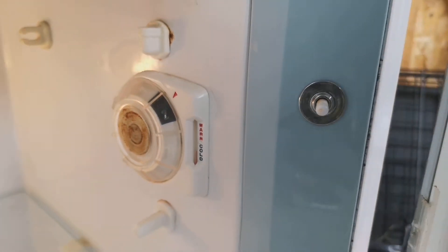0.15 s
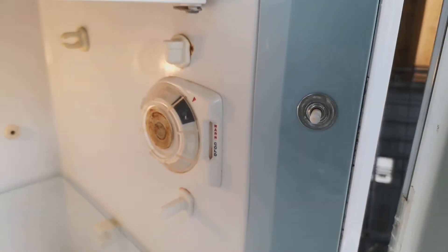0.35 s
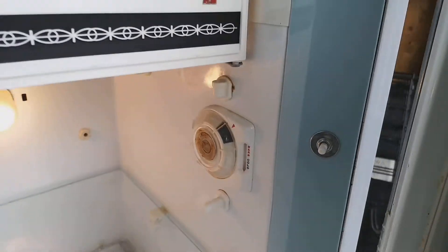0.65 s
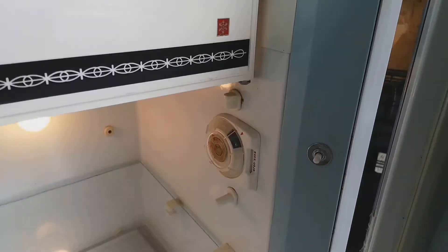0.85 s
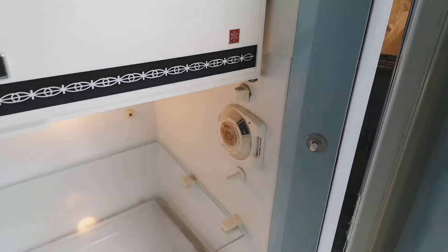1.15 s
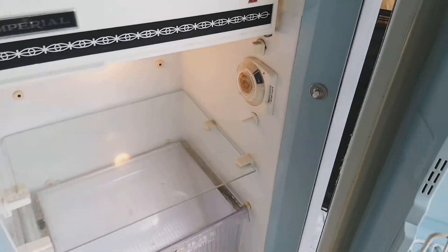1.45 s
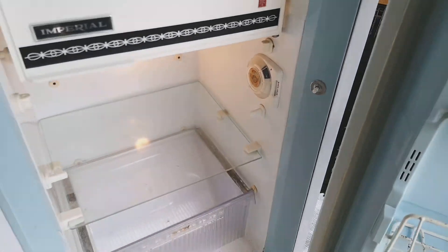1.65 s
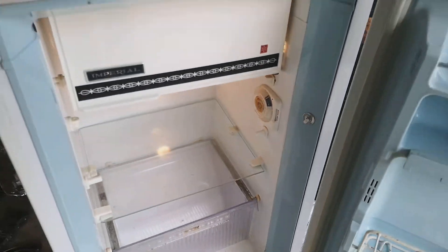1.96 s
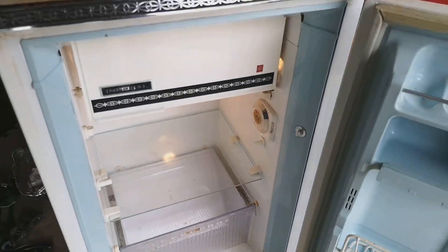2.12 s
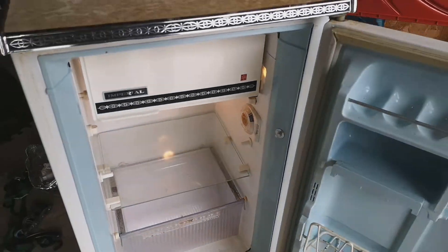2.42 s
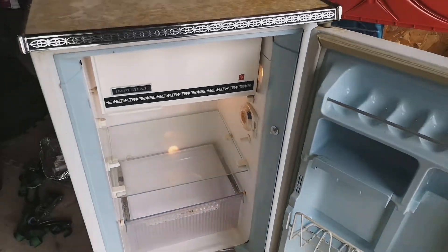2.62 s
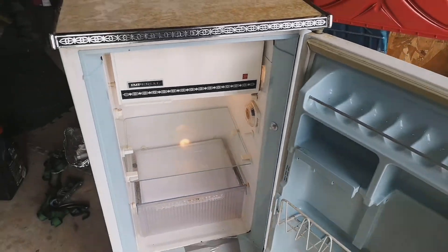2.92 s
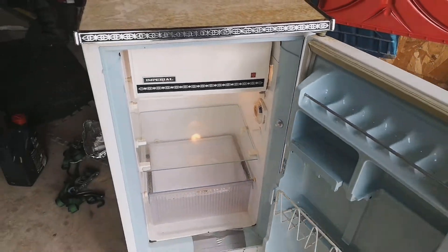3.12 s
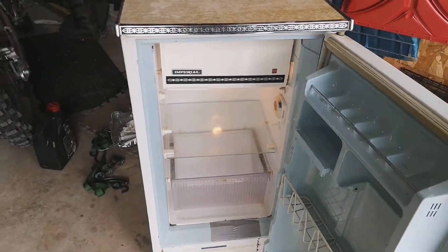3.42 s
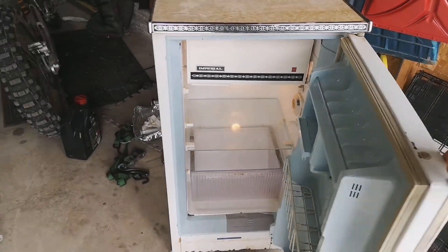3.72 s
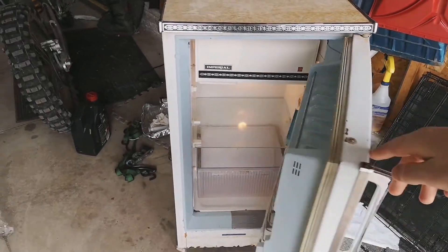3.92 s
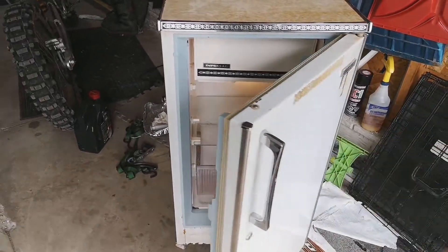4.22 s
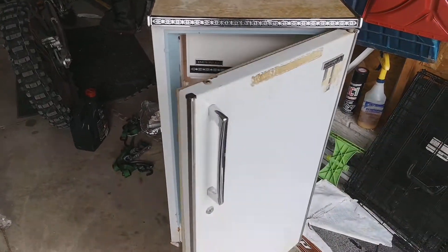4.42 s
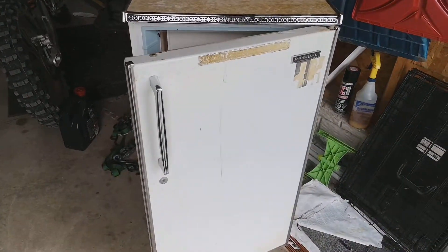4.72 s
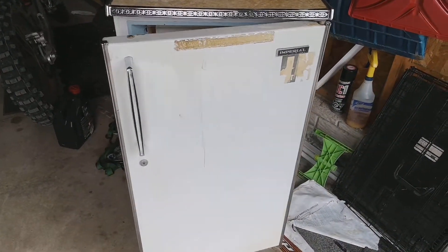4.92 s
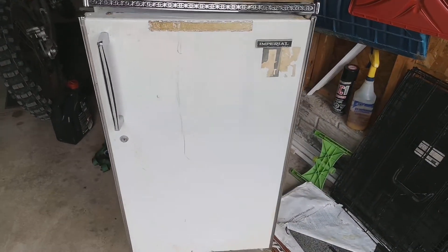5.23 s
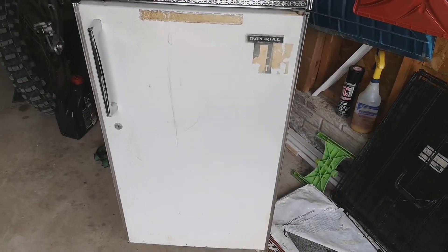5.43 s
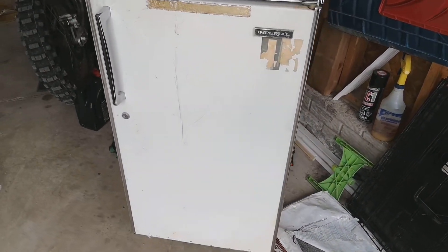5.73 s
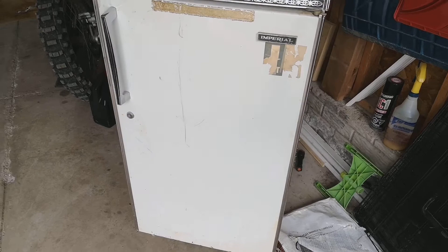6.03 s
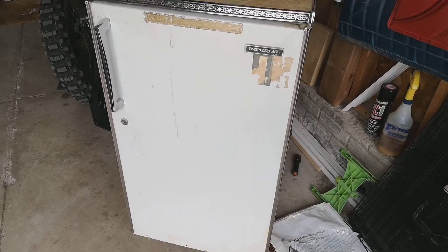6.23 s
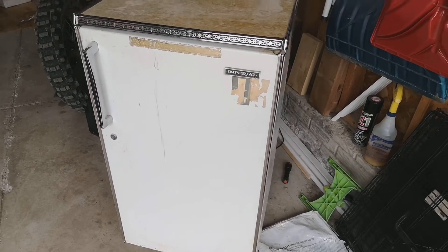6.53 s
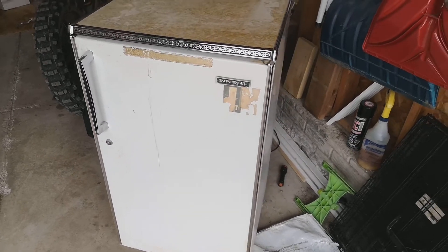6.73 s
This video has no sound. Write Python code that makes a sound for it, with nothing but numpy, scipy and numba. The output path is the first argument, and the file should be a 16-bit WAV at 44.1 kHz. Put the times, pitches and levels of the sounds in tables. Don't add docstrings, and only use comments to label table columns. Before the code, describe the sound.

Close handheld stereo pickup with bright, slightly hissy treble and a faint high whine. Someone shuffles on gritty concrete, soles crushing and dragging grains, loudest early on, with isolated clicks. Movement thins out, then a refrigerator door thuds shut, its hollow panels rattling briefly and trapped air booming. Short hard-walled garage echo follows, then small gritty footfalls over the low motor hum.

```python
import sys
import numpy as np
from scipy import signal
from scipy.io import wavfile
from scipy.ndimage import uniform_filter1d
from numba import njit

SR = 44100
rng = np.random.default_rng(int(sys.argv[2]) if len(sys.argv) > 2 else 0)


def store_wav(level_fs):
    pcm = np.round(np.clip(np.atleast_2d(level_fs), -1, 1) * 32767)
    wavfile.write(sys.argv[1], SR, pcm.T.astype(np.int16))


def ratio_of_db(decibels):
    return 10 ** (np.asarray(decibels, float) / 20)


N = 302526


def level(x, db):
    return x * ratio_of_db(db) / np.sqrt(np.mean(x ** 2))


def band(x, hz, width_hz):
    return signal.lfilter(*signal.iirpeak(hz, hz / width_hz, fs=SR), x)


def cut(x, hz, kind, order=2):
    return signal.sosfilt(signal.butter(order, hz, kind, fs=SR, output="sos"), x)


def walk(rate_hz):
    hold = int(SR / rate_hz)
    steps = np.repeat(rng.standard_normal(N // hold + 1), hold)
    return 1.57 * uniform_filter1d(uniform_filter1d(steps, hold), hold)[:N]


def fade(t, t60_s):
    return np.exp(-np.log(1000) * t / t60_s)


def add(out, start_s, x, pan_db=0.):
    i = int(start_s * SR)
    x = np.atleast_2d(x)[:, :N - i]
    out[:, i:i + x.shape[1]] += x * ratio_of_db(np.array([[pan_db], [-pan_db]]) / 2)


FADE_DB, ROUNDNESS = 21.5, 1.49


def swells(rows, rest_db, lag_s=0., lingers=0.57):
    t = np.arange(0, N + 32, 32) / SR
    peak_s, db, rise_s, fall_s = (column[:, None] for column in np.transpose(list(rows)))
    away = t - peak_s - np.minimum(lag_s, rise_s)
    away = np.where(away < 0, -away / rise_s, away / (fall_s * lingers))
    power = ratio_of_db(db - FADE_DB * away ** ROUNDNESS) ** 2
    return np.interp(np.arange(N) / SR, t, np.sqrt(power.sum(axis=0) + ratio_of_db(rest_db) ** 2))


# peak in seconds, fine grit in dB,
# rise in seconds, fall in seconds, weight (coarse scrape minus fine) in dB.
SCUFFS = [(.62, -35.5, 0.16, 0.51, -12), (.665, -31.5, 0.091, 0.062, -18.5), (.71, -29, 0.049, 0.1, -18),
          (.764, -29.5, 0.071, 0.032, -7.5), (0.821, -30.5, 0.041, 0.094, -7.5),
          (0.891, -28, 0.062, 0.1, -9.5), (.97, -41.5, 0.039, 0.16, -15), (1.253, -33.5, 0.055, 0.082, -13),
          (1.373, -23, 0.0069, 0.094, -9.5), (1.399, -24, 0.028, 0.023, -9), (2.115, -20, 0.056, 0.087, -10),
          (2.158, -31, 0.11, 0.085, -1.5), (2.286, -22.5, 0.0055, 0.21, -6), (2.331, -21, 0.04, 0.1, -7.5),
          (2.921, -41.5, 0.0082, 0.31, -18), (2.965, -41.5, 0.036, 0.13, -2), (3.0, -40, 0.1, 0.075, -3),
          (3.03, -43, 0.06, 0.082, 0), (3.268, -38, 0.006, 0.32, -7), (3.32, -28, 0.048, 0.085, -10),
          (3.358, -29, 0.055, 0.059, -10.5), (4.27, -46.5, 0.12, 0.47, -17), (4.391, -39, 0.12, 0.15, -4.5),
          (4.898, -41, 0.0097, 0.036, -24), (5.082, -52.5, 0.17, 0.22, -1.5), (5.89, -36, 0.02, 0.05, -11),
          (5.91, -39.5, 0.071, 0.18, -6.5), (6.019, -41, 0.035, 0.081, -7.5), (6.583, -37, 0.01, 0.13, -8),
          (6.62, -35.5, 0.066, 0.046, -9.5),
          (.02, -62.5, 0.12, 0.11, 0.5), (.15, -44.5, 0.15, 0.31, -13), (.225, -43, 0.1, .1, -22),
          (.3, -37, .02, 0.031, -35), (.37, -50.5, 0.37, 0.33, -9.5), (.48, -54, 0.082, 0.5, -2.5),
          (2.53, -60.5, .1, 0.18, -6.5), (3.121, -62.5, 0.11, 0.2, 0), (4.891, -41.5, 0.0037, 0.047, -15.5),
          (1.098, -51.5, 0.063, 0.98, -11.5), (1.46, -49.5, 0.063, 0.18, -5.5),
          (1.6, -49, 0.44, 0.58, -17.5), (2.056, -33, 0.033, 0.095, -21), (2.62, -55, 0.17, 0.12, -6.5),
          (2.742, -61.5, 0.048, 0.24, -11.5), (2.87, -52, .03, 0.25, -31), (3.49, -59, .1, 0.08, -16),
          (3.606, -64, 0.13, 0.16, -25.5), (3.82, -61, 0.11, 0.11, -30), (4.56, -52.5, 0.37, 1, -16.5),
          (5.859, -40, 0.012, 0.092, -27), (4.925, -46, 0.022, 0.078, -20), (6.1, -66, .1, 0.39, 0.5),
          (6.385, -59, .03, 0.41, -21), (6.53, -51, 0.25, 0.27, -11.5), (6.7, -46, 0.13, 0.29, -18.5),
          (6.85, -42, 0.085, .1, -12)]
GASKET = [
    (5.28, -62.5, 0.056, 0.18, -2),
    (5.42, -47, 0.019, 0.49, -11.5),
    (5.518, -37, 0.043, 0.034, -12),
    (5.536, -23, 0.0038, 0.044, -11),
    (5.549, -35.5, 0.03, 0.14, -5),
    (5.6, -48, 0.05, 0.17, -8),
    (5.7, -61, .1, 0.29, -1.5),
]
GRIT_REST_DB = -74.5


def press(more_db, lag_s, lingers):
    peak_s, fine_db, rise_s, fall_s, weight_db = np.transpose(SCUFFS + GASKET)
    db = fine_db + more_db(fine_db, weight_db)
    return swells(zip(peak_s, db, rise_s, fall_s), GRIT_REST_DB, lag_s, lingers)


def fine_grit(grit):
    return press(lambda fine_db, weight_db: 0, 0., 0.8) * level(cut(grit, 6720, "high"), -3.0)


def patchy_bands(x, patchy_db, size=1536, count=2):
    z = signal.stft(x, nperseg=size)[2]
    patches = rng.standard_normal((z.shape[1], z.shape[2] // count + 1))
    db = np.repeat(patches, count, axis=1)[:, :z.shape[2]]
    return signal.istft(z * ratio_of_db(patchy_db * db), nperseg=size)[1][:, :N]


SCRAPE_LAG_S, SCRAPE_LINGERS = 0.00031, 0.89
# resonance in Hz, width in Hz, level in dB.
SCRAPE = [(850, 285, 6.5), (1500, 1900, -4), (1970, 2000, -8.5), (3480, 1400, -4.5), (5430, 2370, -2.5)]


def scrape(grit):
    gain = press(lambda fine_db, weight_db: weight_db, SCRAPE_LAG_S, SCRAPE_LINGERS)
    coarse = sum(ratio_of_db(db + 2.6 * walk(22)) * band(grit, hz, width_hz) for hz, width_hz, db in SCRAPE)
    coarse = cut(patchy_bands(coarse, patchy_db=6.5), 1027, "high", order=4)
    return gain * level(coarse, 2.45)


RUMBLE_DB, RUMBLE_TOP_DB, RUMBLE_LINGERS = -11.5, -56, 0.89
# peak in seconds, rumble in dB, rise in seconds, fall in seconds.
LANDINGS = [
    (.45, -67, 0.18, 0.4),
    (3.0, -50, 0.039, 0.17),
    (.88, -45, 0.066, 0.3),
    (1.385, -34, 0.022, 0.063),
    (2.165, -51, 0.079, 0.077),
    (2.315, -43.5, 0.031, 0.23),
    (3.325, -42.5, 0.085, 0.13),
    (4.41, -47.5, 0.063, 0.1),
    (6.0, -56, 0.12, 0.11),
]


def rumble(grit):
    gain = press(lambda fine_db, weight_db: np.minimum(RUMBLE_DB + weight_db, RUMBLE_TOP_DB - fine_db),
                 SCRAPE_LAG_S, RUMBLE_LINGERS)
    gain = np.hypot(gain, swells(LANDINGS, GRIT_REST_DB))
    sole = band(band(grit[0] + 0.15 * grit, 560, 550), 680, 600)
    return gain * level(sole * ratio_of_db(1.3 * walk(30)), -2)


BODY_HZ, BODY_WIDTH_HZ = 1100, 990
# peak in seconds, level in dB, rise in seconds, fall in seconds.
BODIES = [(.65, -52, .15, .2), (.9, -46, 0.11, .15), (1.25, -48, 0.047, 0.076), (1.39, -43, .02, .1),
          (2.16, -37, 0.071, 0.095), (2.32, -37, 0.042, .14), (2.96, -44, .05, .1),
          (3.02, -42.5, 0.076, 0.1), (3.33, -45.5, 0.053, 0.09), (4.4, -54.5, 0.093, 0.14),
          (5.9, -55, .05, 0.22), (6.02, -57, .05, 0.11), (6.6, -52, 0.026, 0.11)]


def scuff_body(grit):
    shared = grit + 0.59 * grit[::-1]
    hollow = band(band(shared, BODY_HZ, BODY_WIDTH_HZ), BODY_HZ, 1.4 * BODY_WIDTH_HZ)
    return level(hollow, 0) * swells(BODIES, -89.0)


def scuffs():
    pan_db = 0.6 + 1.4 * walk(14)
    grit = rng.standard_normal((2, N))
    grit *= ratio_of_db(1.77 * rng.exponential(size=(2, N)) + 0.5 * walk(160) + 0.92 * walk(40))
    rubbing = scuff_body(grit) + fine_grit(grit) + scrape(grit) + rumble(grit)
    return ratio_of_db(np.array([pan_db, -pan_db]) / 2) * rubbing


# start in seconds, peak in dB, dull part minus bright in dB,
# left minus right in dB.
CRACKS = [(0.0294, -57, -12, 12), (0.177, -21.5, -32, 10), (0.216, -20.5, -33, 3), (0.288, -38, -20, 5),
          (0.2954, -27, -28, 10), (0.2994, -30, -22, 3), (3.8503, -42, -25, 5), (2.8957, -40, -20, 8),
          (2.886, -44, -15, 8), (5.843, -39, -25, 8), (5.8867, -33, -15, 8), (5.8902, -31, -15, 6),
          (6.006, -38, -20, 7), (3.886, -51, -30, 5), (.5023, -40, -20, 8), (4.8985, -24.5, -26, 15),
          (4.902, -25.5, -24, 18), (2.312, -16, -22, 8), (2.3224, -15, -22, 7), (3.316, -30, -8, 3),
          (2.8, -55, -20, 5), (1.0794, -55, -23, 1), (1.3733, -23, -16, 20), (1.8799, -29.5, -0.5, 10),
          (1.907, -28.5, -7.5, 11), (1.9643, -29.5, -3, 5), (1.9688, -34, 2.5, 14), (1.973, -28, -31, -2),
          (2.2833, -17, -19, 15), (2.4545, -33, -25, 9), (2.7412, -50, -27, 14), (2.855, -34, -16, 9),
          (2.877, -34, -37, 10), (2.9115, -25.5, -20, 11), (3.266, -33, -3, 8), (3.7915, -32.5, -10, 11),
          (3.8205, -35, -22, 1), (3.8357, -35, -19, 12), (6.379, -53, -27, 18), (4.0158, -46, -24, -1),
          (4.896, -30, -30, 23), (5.4177, -33, -22, 12), (5.853, -33, -26, 8), (6.0942, -32, -23, 21),
          (6.1254, -48, -30, 13), (6.516, -33.5, -32, 14), (6.581, -28, -16, 18)]


def cracks(out):
    t = np.arange(4000) / SR
    for start_s, db, dull_db, pan_db in CRACKS:
        snap = np.minimum(t / 0.00052, 1) * fade(t, 0.0044)
        fizz = 0.068 * fade(t, 0.039)
        burst = rng.standard_normal((2, len(t))) * (snap + fizz)
        burst[1] = 0.44 * burst[0] + 2.27 * burst[1]
        bright, dull = cut(burst, 8500, "high"), band(burst, 6100, 5500)
        sound = bright / np.abs(bright).max() + ratio_of_db(dull_db - 2.5) * dull / np.abs(dull).max()
        add(out, start_s, ratio_of_db(db + 3) * sound, pan_db)


# mode in Hz, level in dB, ring (T60) in seconds.
CABINET = [(38, -16, .25), (82, -21, .25), (207, -18, .2), (112.8, -17, 0.39), (133.4, -26, .4),
           (383, -18, 0.14), (510, -28, 0.12), (160, -23.5, 0.46), (189.7, -24, 0.41), (230, -27, 0.21),
           (249.3, -8.5, 0.15), (271, -15, .1), (300, -4.5, 0.047), (335, -10.5, 0.16), (434, -13, 0.072),
           (480, -10.5, 0.05), (590, -20, 0.098), (673, -17, 0.056), (763, -24, 0.075), (860, -1, 0.028),
           (905, -19, 0.1), (1010, -39, 0.1), (1150, -26, 0.14), (1500, -28, 0.14), (1700, -16, 0.09),
           (1845, -21, 0.15)]


def panel_ring(t):
    return sum(ratio_of_db(db) * np.sin(2 * np.pi * hz * t) * fade(t, t60_s) for hz, db, t60_s in CABINET)


# start in seconds, pitch in Hz, peak in dB, swell in seconds.
BOOM = (5.5315, 66, -23.5, .028)


def boom(out, t):
    start_s, hz, db, swell_s = BOOM
    swell = t / swell_s * np.exp(1 - t / swell_s)
    add(out, start_s, ratio_of_db(db) * swell * np.sin(2 * np.pi * hz * t))


DOOR_PAN_DB = 1.2
# start in seconds, push in dB, contact in ms, crack in dB.
BLOWS = [
    (5.53, -2, 3.7, -36),
    (5.5358, 1.5, 0.34, -17),
    (5.5388, -9, 0.54, -34),
    (5.5432, -8.5, 1.03, -35),
    (5.55, -4, 1.9, -38),
    (5.5596, 2, 2.26, -36),
    (5.58, -9, 4.4, -46),
    (5.605, -6, 2.7, -38),
    (5.638, -15, 3.1, -52),
    (5.688, -28, 3.3, -61),
]


def door(out):
    t = np.arange(SR) / SR
    ring = panel_ring(t)
    for start_s, push_db, contact_ms, crack_db in BLOWS:
        push = np.hanning(int(contact_ms * SR / 1000) + 3)
        thump = signal.fftconvolve(ring, push / push.sum())
        add(out, start_s, ratio_of_db(push_db - 23.0) * thump, DOOR_PAN_DB)
        crack = cut(rng.standard_normal((2, len(t))), 1700, "high") * fade(t, 0.0047)
        add(out, start_s, ratio_of_db(crack_db) * crack)
    shaking = cut(rng.standard_normal(len(t)), 970, "low") * fade(t, 0.25)
    add(out, BLOWS[1][0], ratio_of_db(-52) * signal.fftconvolve(ring, shaking), DOOR_PAN_DB)
    boom(out, t)


# start in seconds, #
# peak in dB, pitch in Hz, ring in seconds.
KNOCKS = [(0.376, -39.5, 1620, 0.046), (.378, -46.5, 2260, 0.034), (0.378, -42.5, 1150, 0.019),
          (0.661, -41, 480, 0.091), (0.759, -36, 473, 0.024), (.762, -45, 2070, 0.022),
          (0.764, -55, 1100, 0.027), (.82, -41, 460, 0.11), (2.92, -40.5, 3040, 0.046),
          (3.13, -49, 594, 0.037), (3.517, -42.5, 850, 0.016), (3.836, -49.5, 2420, .02),
          (3.94, -54, 1150, 0.033), (4.163, -53, 1500, 0.016), (4.568, -46, 1700, 0.022),
          (4.889, -49, 1800, 0.014), (5.07, -50, 810, 0.1), (5.272, -45, 1150, 0.0081),
          (5.3, -45, 300, 0.027), (5.286, -49, 2340, 0.008), (6.0941, -26, 12200, 0.012)]


def knocks(out):
    t = np.arange(6000) / SR
    for start_s, db, hz, ring_s in KNOCKS:
        contact = rng.standard_normal(600) * fade(t[:600], 0.021)
        part = np.sin(2 * np.pi * hz * t) * fade(t, 0.48 * ring_s)
        tap = band(signal.fftconvolve(contact, part), hz, hz)
        add(out, start_s, ratio_of_db(db) * tap / np.abs(tap).max())


@njit
def walls(x, lags, gain, damp):
    line, soft, out = np.zeros((8, 4096)), np.zeros(8), np.zeros((2, len(x)))
    for i in range(len(x)):
        total = 0.
        for k in range(8):
            soft[k] += (1 - damp) * (gain[k] * line[k, (i - lags[k]) & 4095] - soft[k])
            total += soft[k]
            out[k % 2, i] += soft[k]
        for k in range(8):
            line[k, i & 4095] = x[i] + soft[k] - total / 4
    return out


def garage_echo(near):
    t60_s, damp = 0.36, 0.16
    lags = rng.integers(500, 2600, 8)
    sent = cut(cut(near.mean(axis=0), 94, "high"), 8050, "low") + 1e-18
    echo = walls(sent, lags, ratio_of_db(-60 * lags / SR / t60_s), damp)
    middle = echo.mean(axis=0)
    return ratio_of_db(-9.5) * (middle + cut(echo - middle, 260, "high"))


# peak in seconds, hum in dB, rise in seconds, fall in seconds.
SURGES = [(.13, -47.5, 1.1, 0.3), (.5, -56, .22, .2), (.99, -46, 0.1, 0.055), (1.33, -54.5, 0.15, 0.94),
          (2.72, -56.5, 0.21, 0.46), (2.95, -55.5, 0.63, 0.13), (3.11, -55, 0.36, 0.13),
          (3.3, -51, 0.055, .4), (3.45, -53, 0.37, 0.064), (4.2, -62, 0.89, 0.33), (4.33, -48, 0.13, 0.076),
          (4.96, -55, 0.17, 0.7), (5.78, -63, .8, .1), (6.33, -51.5, 0.46, 0.094), (6.51, -59, 0.34, .1),
          (6.855, -49, 0.15, .1)]
# peak in seconds, level in dB, rise in seconds, fall in seconds.
OVERTONES = [(.01, -47, .1, 0.19), (.25, -50.5, 0.36, 0.46), (.57, -55.5, 0.44, 1), (.99, -50, 0.11, 0.32),
             (1.3, -59, .4, 0.82), (2.02, -64.5, 0.12, 0.89), (2.7, -57, 0.1, 0.26),
             (3.54, -64, .13, 0.088), (4.9, -59.5, 1.5, 0.22), (5.3, -58.5, 0.66, 1.1),
             (5.8, -54, 0.3, 0.11), (5.93, -58.5, .3, 1.2), (6.51, -54, 0.11, 0.072), (6.68, -65, .3, .15)]


def compressor():
    hum = band(band(rng.standard_normal(N), 61.8, 10.0), 66.6, 8.3)
    overtone = band(band(rng.standard_normal(N), 103.4, 23.4), 103.4, 23.4)
    hum = level(hum, -1.5) * swells(SURGES, -63.5)
    return hum + level(overtone, -1.9) * swells(OVERTONES, -73)


# frequency in Hz, density in dB per Hz.
GARAGE = [(13, -28), (22, 4.5), (75, -0.5), (96, -5.5), (128, -2), (159, -10.5), (297, -9), (417, -16),
          (726, -17), (1460, -26.5), (1950, -35.5), (3560, -37.5), (7000, -83), (9100, -65), (15400, -120)]


def room_air():
    table_hz, table_db = np.transpose(GARAGE)
    out, swell = 0, walk(0.92)
    for hz in 25 * 2 ** np.arange(0, 8.2, .5):
        mid, side = (band(band(rng.standard_normal(N), hz, hz / 2), hz, hz / 2) for _ in range(2))
        db = np.interp(np.log(hz), np.log(table_hz), table_db) + .6 * swell + 1.5 * walk(5)
        width = min((hz + 30) / 860.0, 1)
        out = out + ratio_of_db(db) * (mid + width * side * np.array([[1], [-1]]))
    return level(out, -55.5)


# pitch in Hz, level in dB.
WHINE = [(12000, -58.5), (13400, -77)]
# time in seconds, whine change in dB.
WHINE_LOAD = [(0, -7), (2.3, -14), (2.55, -1), (3.4, 0), (3.75, 1), (3.85, -2), (4.15, -3), (4.4, -3),
              (5.3, -1), (6.3, -6), (6.86, -3)]


def whine():
    t = np.arange(N) / SR
    load_db = np.interp(t, *np.transpose(WHINE_LOAD))
    tones = sum(ratio_of_db(db + load_db + 1.2 * walk(3)) * np.sin(2 * np.pi * hz * t) for hz, db in WHINE)
    return tones * np.array([[1.], [.3]])


# resonance in Hz, width in Hz, boost in dB, roll-off in Hz.
PORTS = [
    (11540, 1650, 13.5, 19900),
    (10250, 1900, 10, 10600),
]


def ports(x):
    return np.array([cut(v + ratio_of_db(db) * band(v, hz, width_hz), top_hz, "low", order=1)
                     for v, (hz, width_hz, db, top_hz) in zip(x, PORTS)])


def scene():
    near = scuffs()
    for add_to in (cracks, knocks, door):
        add_to(near)
    return near + garage_echo(near) + room_air() + compressor()


def top_cut(x):
    return signal.sosfilt(signal.butter(12, 16480, fs=SR, output="sos"), x)


def record(dry):
    dry = np.array([dry[0], np.roll(dry[1], 4)])
    hiss = level(cut(rng.standard_normal((2, N)), 14800, "high"), -60.5)
    x = ports(dry + hiss) + whine()
    x = signal.sosfilt(signal.ellip(10, .3, 36, 15150, fs=SR, output="sos"), x)
    return top_cut(x)


dry = scene()
out = record(dry)
store_wav(out)
```